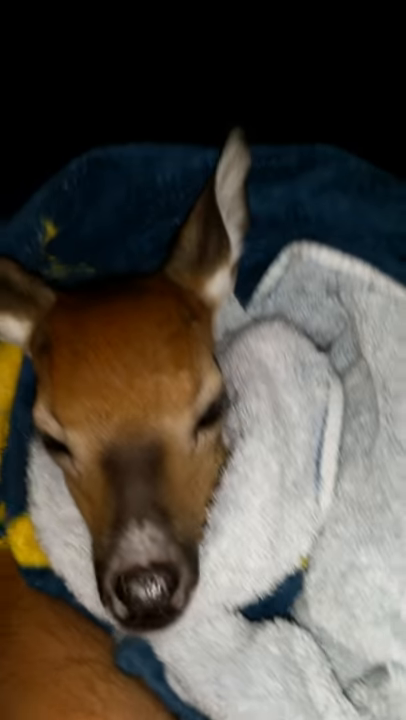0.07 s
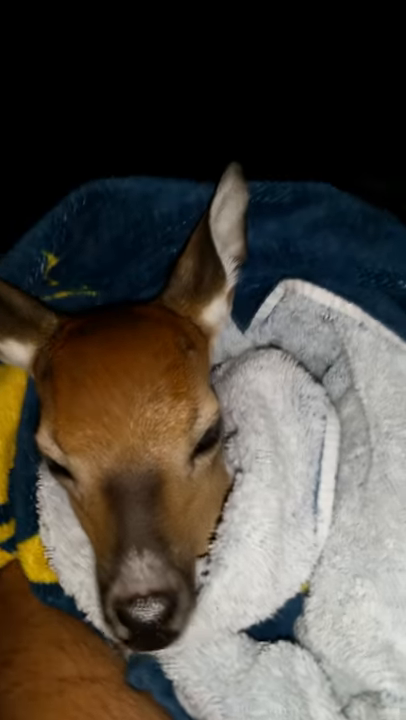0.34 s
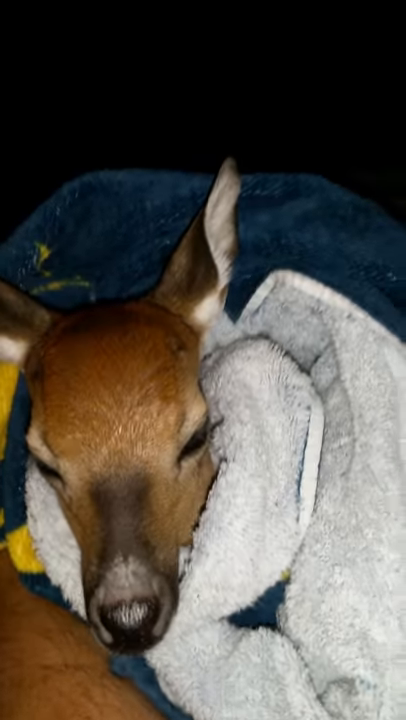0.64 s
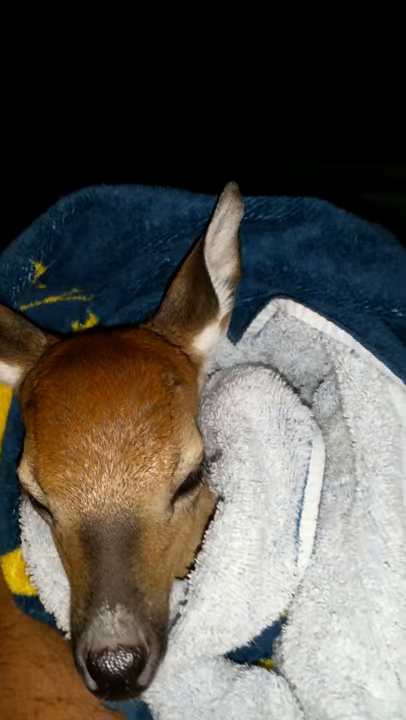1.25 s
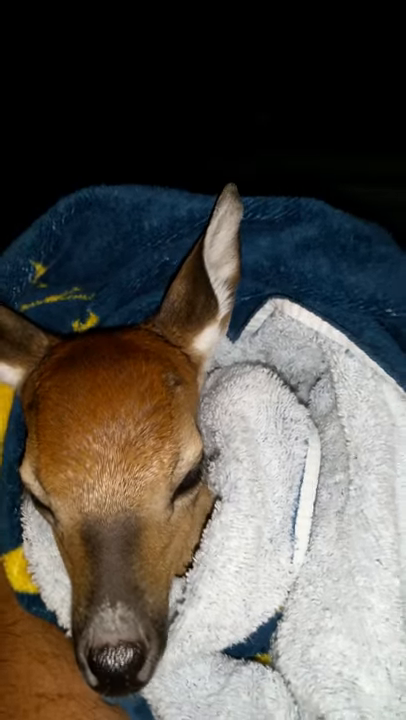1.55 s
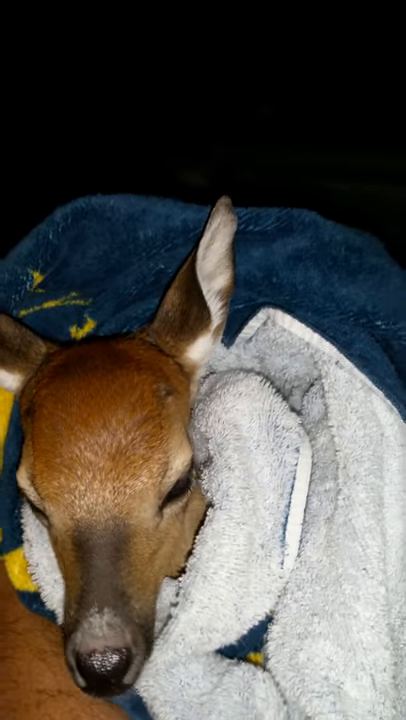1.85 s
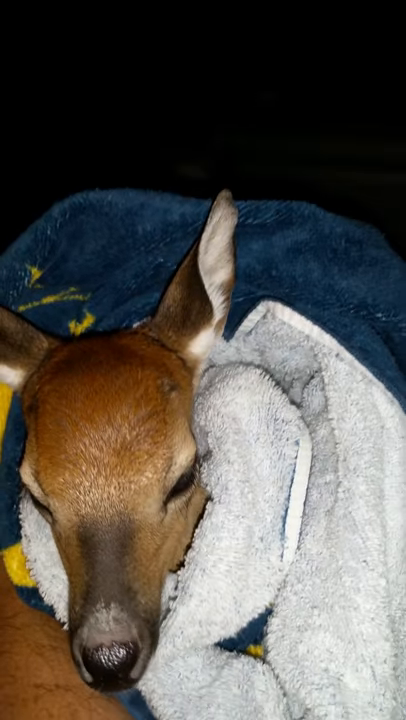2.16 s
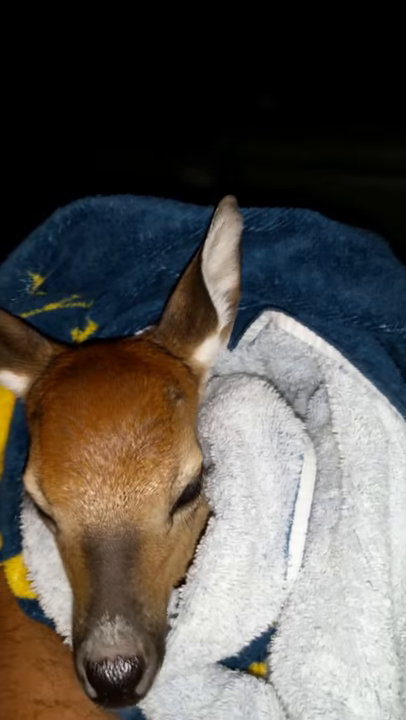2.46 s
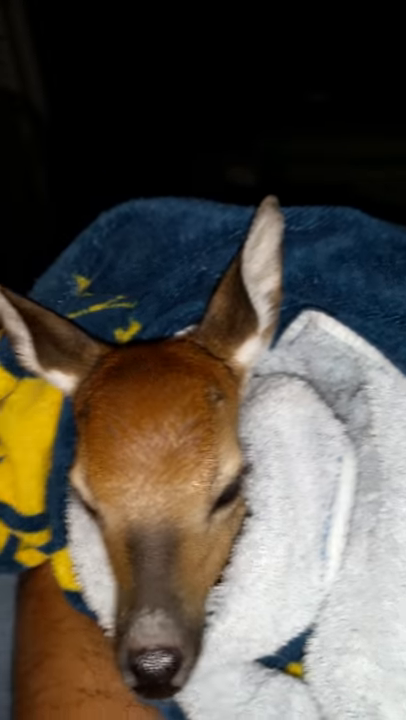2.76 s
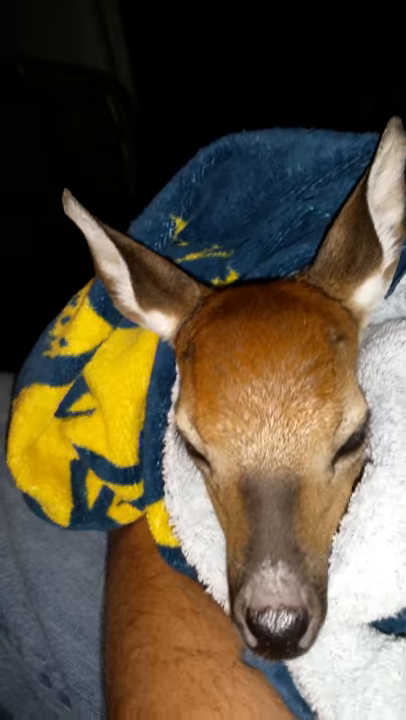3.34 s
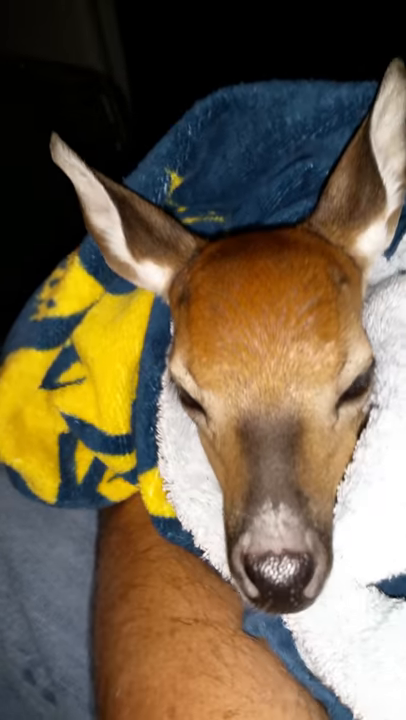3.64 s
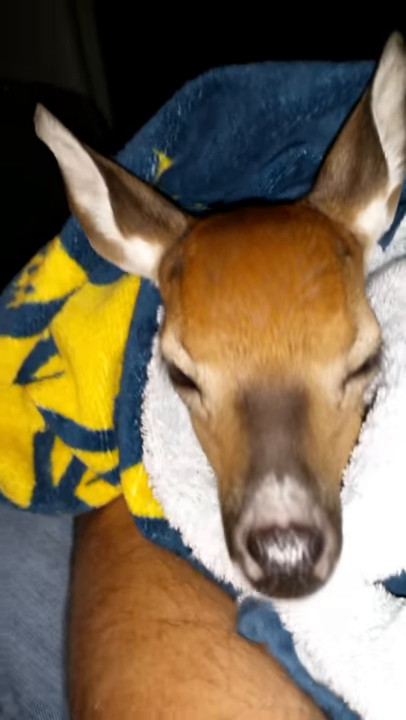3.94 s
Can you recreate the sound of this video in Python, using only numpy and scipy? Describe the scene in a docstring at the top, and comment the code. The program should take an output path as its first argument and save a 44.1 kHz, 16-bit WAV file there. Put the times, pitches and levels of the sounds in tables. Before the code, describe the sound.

A car rumbles along steadily, heard from inside, thudding softly over small bumps.

```python
"""Inside a car at a steady speed, windows shut. All along, the road shakes the body into a low boom,
the tyres roar and air hisses past. At the start a towel rustles faintly close by, thin high squeaks
begin to come and go, and the cabin briefly hums. From about 1.3 s the wheels thud softly over three
bumps. The towel is then shifted in short brushes, with one tick. Just after 3 s come two more bumps,
the body shudders, and a droning trim panel grows louder towards the end."""
import sys
import numpy as np
from scipy import signal
from scipy.fft import rfft, irfft
from scipy.io import wavfile
from scipy.ndimage import uniform_filter1d

SR = 44100
rng = np.random.default_rng(int(sys.argv[2]) if len(sys.argv) > 2 else 0)


def transcribe(signal):
    """Save signal, clipped to [-1, 1], as a 16-bit WAV file at the path in sys.argv[1]."""
    frames = np.atleast_2d(signal).T
    limited = np.clip(frames, -1, 1)
    pcm = np.round(limited * 32767).astype(np.int16)
    wavfile.write(sys.argv[1], SR, pcm)


N = 176400
TIME = np.arange(N) / SR
FREQS = np.maximum(np.arange(N // 2 + 1) * SR / N, 1)

# how much louder the left side is than the right: pitch_hz, left_minus_right_db
LEFT_RIGHT_BALANCE = [(40, -0.5), (80, 3), (125, 5), (170, 2.5), (220, -1), (310, 0.5), (420, 2.5),
                      (760, -0.2), (1100, 1.5), (1600, 7), (2900, 3.5), (4000, 1), (4800, -2.5), (7000, 0),
                      (11000, 1), (13000, 0)]


def from_db(db):
    """Turn decibels into a number to multiply a sound by."""
    return 10 ** (np.asarray(db) / 20)


def pan(left_minus_right_db):
    """Left and right gains that lean a sound to one side."""
    return from_db(np.array([[.5], [-.5]]) * left_minus_right_db)


def over_time(points):
    """Join (time, value) points with straight lines, giving a value for every sample."""
    return np.interp(TIME, *np.transpose(points))


def over_pitch(points):
    """Join (pitch, value) points on an octave scale, giving a value for every frequency."""
    pitch_hz, value = np.transpose(points)
    return np.interp(np.log(FREQS), np.log(pitch_hz), value)


def drift(rate_hz):
    """A random wobble of typical size 1, mostly slower than the given rate."""
    wobble = irfft(rfft(rng.standard_normal(N)) / (1 + (FREQS / rate_hz) ** 2), N)
    return wobble / wobble.std()


def burst(start_s, attack_s, decay_s):
    """A level that rises quickly, then dies away."""
    age = np.maximum(TIME - start_s, 0)
    return np.minimum(age / attack_s, 1) * np.exp(-np.maximum(age - attack_s, 0) / decay_s)


def swell(centre_s, half_length_s):
    """A level that rises and falls smoothly, in a bell shape."""
    return np.exp(-((TIME - centre_s) / half_length_s) ** 2)


def resonances(modes, order=1):
    """Gain at each frequency of parts that ring at their own pitches; a higher order is steeper."""
    power = 0
    for pitch_hz, width_hz, level_db in modes:
        off_pitch = (FREQS ** 2 - pitch_hz ** 2) / (FREQS * width_hz)
        power = power + from_db(level_db) ** 2 / (1 + off_pitch ** 2) ** order
    return np.sqrt(power)


def cabin_noise(colour):
    """Stereo noise with a given gain at each frequency: the sides match in the bass, not the treble."""
    # how alike left and right are: pitch_hz, likeness (1 the same, 0 unrelated, -1 opposite)
    side_likeness = [(35, .99), (95, .975), (140, .89), (210, .93), (330, .89), (540, .52), (690, .68),
                     (850, .4), (1100, -.15), (1400, -.03), (1750, -.25), (2300, 0), (12000, -.03)]
    alike = over_pitch(side_likeness)
    common, difference = rfft(rng.standard_normal((2, N))) * np.sqrt(SR / 4)
    pair = np.sqrt(1 + alike) * common + np.array([[1], [-1]]) * np.sqrt(1 - alike) * difference
    return irfft(pair * colour * pan(over_pitch(LEFT_RIGHT_BALANCE)), N)


def steadied(pair, span_s):
    """Even out a noise's loudness over stretches longer than the given span."""
    power = uniform_filter1d(np.mean(pair ** 2, axis=0), int(span_s * SR), mode="wrap")
    return pair * np.sqrt(power.mean() / power)


def shaken(modes, steady_s):
    """The car's low resonances ringing under steady random shaking."""
    bottom_hz, top_hz = 24, 176
    bass_band = 1 / np.sqrt((1 + (FREQS / top_hz) ** 8) * (1 + (bottom_hz / FREQS) ** 6))
    return steadied(cabin_noise(resonances(modes, order=2) * bass_band), steady_s)


def air():
    """Air rushes along the windows, fluttering slightly, over a faint even hiss."""
    # tone of the rushing air: pitch_hz, level_db_per_hz
    rush_colour = [(500, -100), (1400, -84.5), (2500, -84), (2950, -86.5), (3500, -91), (4100, -99),
                   (4800, -104), (6000, -104), (7400, -107), (8800, -119), (16000, -130)]
    # tone of the faint hiss: pitch_hz, level_db_per_hz
    hiss_colour = [(3000, -112), (10500, -111), (11900, -108), (13000, -111), (15600, -111)]
    flutter_db = 0.73 * drift(rate_hz=30)
    rush = cabin_noise(from_db(over_pitch(rush_colour))) * from_db(flutter_db)
    return rush + cabin_noise(from_db(over_pitch(hiss_colour)))


def squeaks():
    """Very faint high squeaks to the right: narrow bands of noise that slide and waver in pitch."""
    # one squeak a row: centre_s, half_length_s, pitch_hz, glide_hz_per_s, width_hz, level_db
    thin_squeaks = [(.06, 0.032, 13200, 0, 300, -62), (.16, .09, 13700, 2998, 1500, -69.5),
                    (.255, .04, 13050, -17000, 220, -72), (.335, .015, 13000, 20000, 200, -67),
                    (.54, .04, 15250, 0, 300, -69), (.67, .06, 12800, -6000, 130, -71.5),
                    (1.62, .07, 12550, 1000, 700, -70), (1.79, .13, 12850, 499, 450, -74),
                    (2.895, .012, 14100, 0, 150, -71), (3.55, .045, 12550, -10000, 130, -71.5)]
    waver_hz = 90 * drift(rate_hz=30)
    noise = rng.standard_normal((2, N)) + 1j * rng.standard_normal((2, N))
    out = np.zeros((2, N))
    for centre_s, half_length_s, pitch_hz, glide_hz_per_s, width_hz, level_db in thin_squeaks:
        near = np.abs(TIME - centre_s) < 2 * half_length_s
        path_hz = pitch_hz + glide_hz_per_s * (TIME[near] - centre_s) + waver_hz[near]
        low_pass = signal.butter(2, width_hz / 2, fs=SR, output="sos")
        slow_noise = signal.sosfilt(low_pass, noise[:, near])
        tone = np.exp(2j * np.pi * np.cumsum(path_hz) / SR)
        airy_tone = np.real(slow_noise / slow_noise.std() * tone)  # moves the noise up to the pitch
        out[:, near] += from_db(level_db) * swell(centre_s, half_length_s)[near] * airy_tone
    return out * pan(left_minus_right_db=-9)


def towel_tick():
    """The towel gives one tiny bright tick as it is shifted."""
    snap = rng.standard_normal((2, N)) * burst(start_s=2.8384, attack_s=.0005, decay_s=.0025)
    high_pass = signal.butter(2, 7160, "high", fs=SR, output="sos")
    return from_db(-46) * signal.sosfilt(high_pass, snap + 1e-18)


def towel_rustle():
    """The towel's fibres rub with a grainy sound and short brushes, over a duller sliding."""
    # tone of the rubbing fibres: pitch_hz, level_db_per_hz
    fibre_colour = [(1000, -112), (3000, -100), (4700, -102), (5900, -99), (7500, -103.5), (9300, -114),
                    (15000, -118)]
    # how briskly the towel moves: time_s, gain_db
    movement = [(0, 5.5), (.11, -4), (.17, 3), (.32, -10), (.55, -4), (.7, -13), (1.42, -16), (1.57, -7.5),
                (2.05, -21), (2.4, -6.5), (2.85, -14), (3.05, -7.5), (3.38, -4), (3.48, -10), (3.7, -10),
                (4, -14)]
    # short brushes of the towel: start_s, gain_db
    strokes = [(2.262, -2), (2.335, -3), (2.46, 0), (2.644, 2), (3.064, 1), (3.179, 2), (3.26, 0),
               (3.361, 4), (3.404, 4), (3.428, 1), (3.568, 2), (3.731, 3)]
    # tone of the sliding cloth: pitch_hz, level_db_per_hz
    slide_colour = [(1200, -108), (2300, -89), (2900, -80.5), (3500, -91.5), (4300, -106), (8000, -130)]
    # how strongly it slides: time_s, gain_db
    slide_strength = [(0, -8.5), (1.2, -7), (1.45, -13), (1.56, 0.5), (1.75, -10.5), (2.95, -6), (3.08, -3),
                      (3.15, -5), (3.27, 0), (3.4, -3), (3.48, -7), (3.58, 0), (3.63, -12), (3.78, -2),
                      (3.9, -18)]
    grain_db = -0.5 * drift(rate_hz=110)
    rub = from_db(over_time(movement) + grain_db)
    brushes = sum(from_db(db) * burst(start_s, attack_s=.004, decay_s=.0075) for start_s, db in strokes)
    slide = cabin_noise(from_db(over_pitch(slide_colour))) * from_db(over_time(slide_strength))
    fibres = cabin_noise(from_db(over_pitch(fibre_colour)))
    return fibres * (rub + brushes) + slide


def trim_panel():
    """A trim panel is shaken into a narrow drone that grows towards the end."""
    # where the panel rings: pitch_hz, width_hz, level_db_per_hz
    panel_modes = [(315.6, 9.3, -51), (349, 15, -57.5)]
    # how strongly it drones: time_s, gain_db
    drone_strength = [(0, -4.5), (2.8, -2), (3.5, 3)]
    drone = steadied(cabin_noise(resonances(panel_modes, order=2)), span_s=0.21)
    return drone * from_db(over_time(drone_strength))


def tyres():
    """The rolling tyres make a steady low roar, and higher tread noise that follows the road surface."""
    # tone of the roar heard through the body: pitch_hz, level_db_per_hz
    roar_colour = [(15, -57.5), (110, -53), (160, -51), (190, -54), (250, -55.5), (350, -56.5),
                   (430, -60.5), (520, -62), (640, -66.5), (900, -67), (1150, -71), (1500, -76.5),
                   (1900, -83.5), (6000, -125)]
    # where the tread and the air inside the tyres ring: pitch_hz, width_hz, level_db_per_hz
    tyre_modes = [(215.2, 38, -53.5), (240, 27, -57.5), (469, 29, -63.5), (580.4, 9.8, -61), (745, 33, -63),
                  (1333, 12, -68), (1494, 14, -75.5)]
    # how the road surface changes the tread noise: time_s, gain_db
    road_surface = [(0, 0), (.5, 0.5), (1.2, 2.24), (1.55, 0.5), (1.95, 1.5), (2.2, -0.4), (2.5, 0.5),
                    (2.88, -1), (3.08, 1), (3.65, -1), (4, 0.6)]
    tread_from_hz, muffled_from_hz, steady_s = 439, 1700, 0.14
    muffling = 1 / np.sqrt(1 + (FREQS / muffled_from_hz) ** 8)
    colour = np.hypot(from_db(over_pitch(roar_colour)), resonances(tyre_modes) * muffling)
    low_share = 1 / (1 + (FREQS / tread_from_hz) ** 8)
    roar = steadied(cabin_noise(colour * np.sqrt(low_share)), steady_s)
    tread = steadied(cabin_noise(colour * np.sqrt(1 - low_share)), steady_s)
    return roar + tread * from_db(over_time(road_surface))


def cabin_hum():
    """One cabin resonance swells into a clean low tone and sinks back."""
    pitch_hz, level_db = 111, -28
    balance_db = np.interp(pitch_hz, *np.transpose(LEFT_RIGHT_BALANCE))
    tone = np.sin(2 * np.pi * (pitch_hz * TIME + rng.random()))
    return from_db(level_db) * pan(balance_db) * swell(centre_s=0.36, half_length_s=0.16) * tone


def bumps():
    """The suspension thuds over bumps, sharper ones sounding higher; late on, the body shudders."""
    # bumps in the road: centre_s, half_length_s, gain_db, sharpness_db_per_octave
    road_bumps = [(1.344, 0.11, -3, 0), (1.647, 0.045, -0.5, -1.5), (1.958, 0.069, -3.5, 0),
                  (3.092, 0.061, -1, 1), (3.294, 0.072, -0.5, -4)]
    # where the suspension rings after a bump: pitch_hz, width_hz, level_db_per_hz
    thud_modes = [(68, 38, -36), (112, 30, -39)]
    # where the body shudders: pitch_hz, width_hz, level_db_per_hz
    shudder_modes = [(36, 17, -39.5)]
    lowest_hz, steady_s = thud_modes[0][0], 0.034
    thuds = 0
    for centre_s, half_length_s, gain_db, sharpness in road_bumps:
        modes = [(hz, width, db + sharpness * np.log2(hz / lowest_hz)) for hz, width, db in thud_modes]
        thuds = thuds + shaken(modes, steady_s) * from_db(gain_db) * swell(centre_s, half_length_s)
    shudder = shaken(shudder_modes, steady_s) * burst(start_s=3.02, attack_s=.1, decay_s=0.51)
    return thuds + shudder


def body_boom():
    """The road shakes the suspension and the cabin, and they boom at their own low pitches."""
    # where the suspension and cabin ring: pitch_hz, width_hz, level_db_per_hz
    boom_modes = [(35, 16, -47.5), (58.7, 18.5, -40.5), (75.1, 15.7, -43), (102.2, 11, -45),
                  (112.8, 23.5, -46), (131, 28.5, -47)]
    # how hard the road shakes the body: time_s, gain_db
    road_shaking = [(0, -1.5), (.3, 0), (.55, -3.5), (.7, 1.5), (.82, -8), (.95, 0), (1.18, -6), (1.45, -1),
                    (1.8, -3.5), (2.48, .5), (2.92, -1), (3.2, -0.5), (3.45, -3), (3.75, .5)]
    return shaken(boom_modes, steady_s=0.21) * from_db(over_time(road_shaking))


def scene():
    """Everything heard in the cabin, added together."""
    car = body_boom() + bumps() + cabin_hum() + tyres() + trim_panel() + air()
    return car + towel_rustle() + towel_tick() + squeaks()


def record(dry):
    """Fade both ends quickly and cut off the very highest treble."""
    fade_s, cutoff_hz = .004, 15700
    from_edge_s = np.minimum(TIME, TIME[-1] - TIME)
    fade = np.sin(np.pi / 2 * np.minimum(from_edge_s / fade_s, 1)) ** 2
    steep_low_pass = signal.ellip(12, .1, 80, cutoff_hz, fs=SR, output="sos")
    return signal.sosfilt(steep_low_pass, dry * fade)


dry = scene()
out = record(dry)
transcribe(out)
```